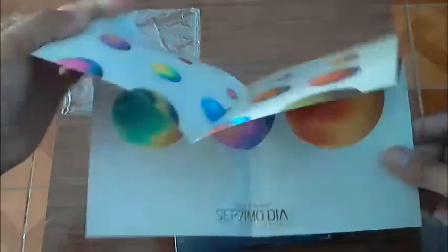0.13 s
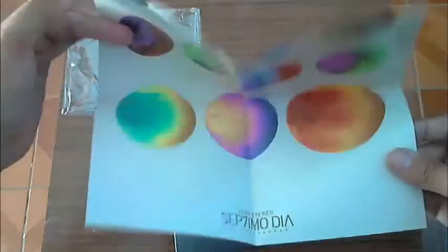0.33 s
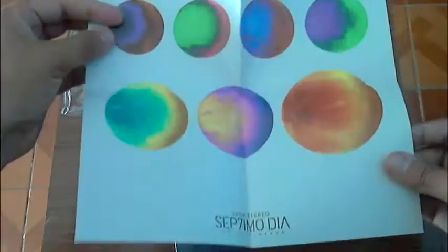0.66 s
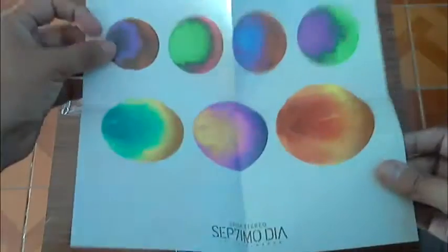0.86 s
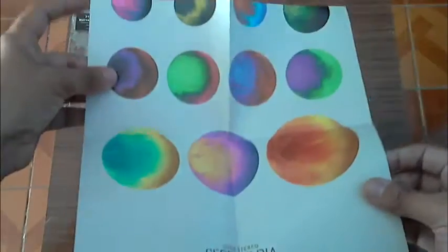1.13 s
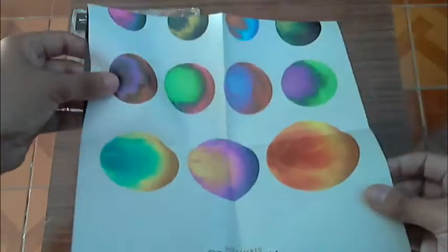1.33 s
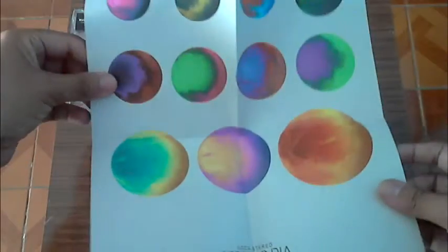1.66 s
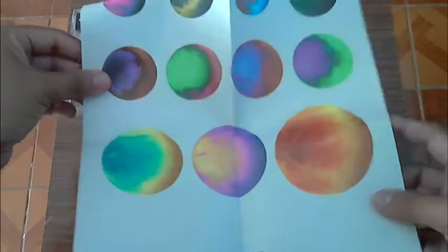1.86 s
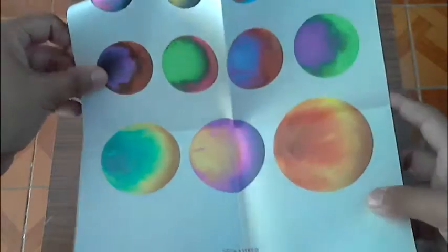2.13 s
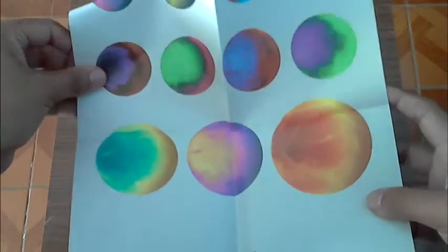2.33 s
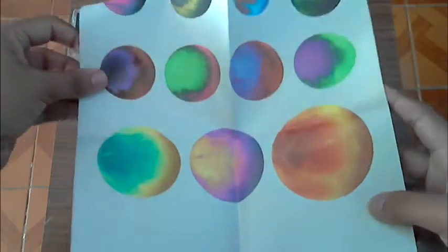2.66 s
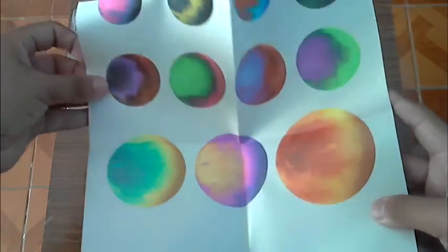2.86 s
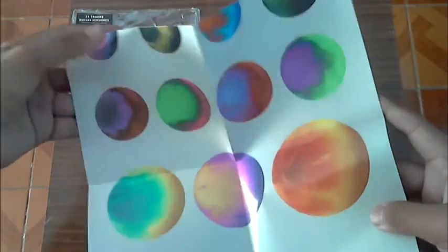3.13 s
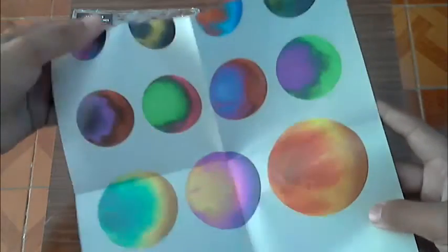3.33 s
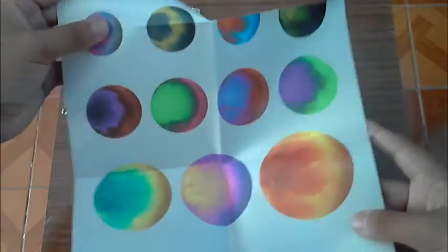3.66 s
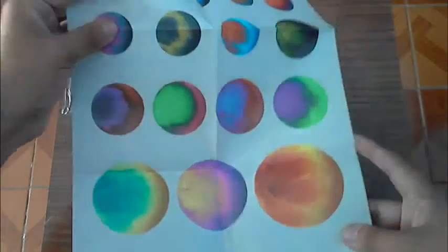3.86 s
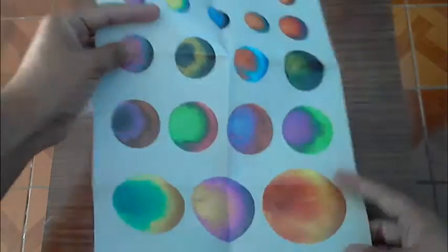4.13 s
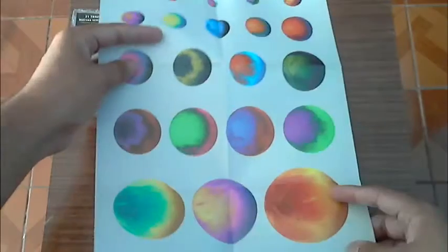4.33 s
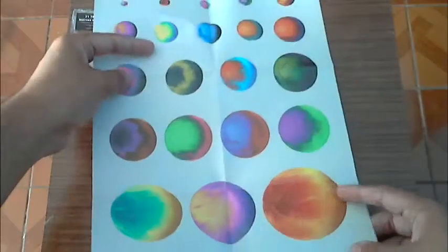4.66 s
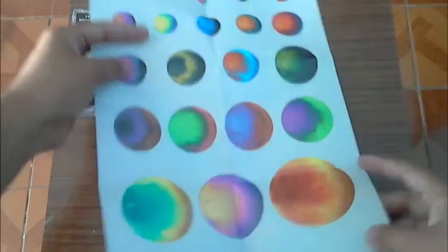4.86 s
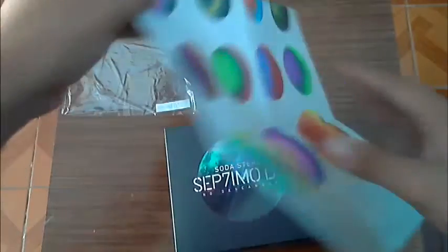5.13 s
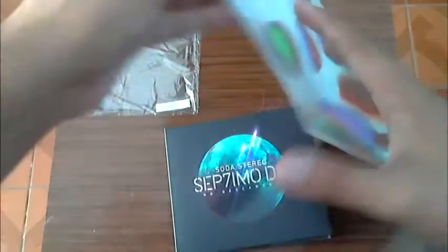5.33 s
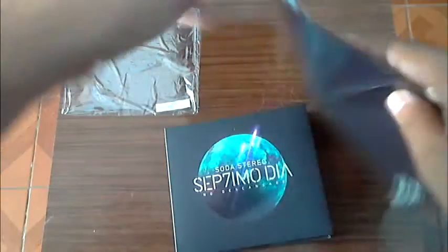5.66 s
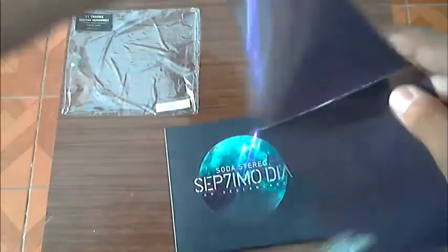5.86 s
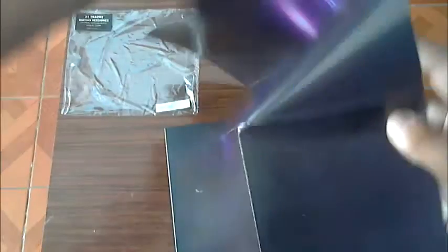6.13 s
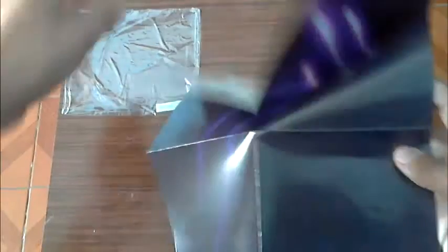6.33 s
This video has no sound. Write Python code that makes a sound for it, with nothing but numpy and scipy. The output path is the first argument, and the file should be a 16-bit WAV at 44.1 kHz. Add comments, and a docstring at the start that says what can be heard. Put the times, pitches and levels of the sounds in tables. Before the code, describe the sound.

A folded paper poster is handled close to a small microphone indoors. It starts with a sharp pop and a brief scrape as the sheet opens. From about 0.8 seconds the creases buckle in irregular, hollow, slightly honky pops over soft crinkling, with strong ones near 0.9 and 1.6 seconds. Short sliding scrapes and more clusters of pops follow between 1.8 and 3 seconds, leading to a loud pop with a dull bump of air at 3.1. More crackles gather from 3.7 seconds, with a sharp snap and scrape at 4. After a brief lull, light pops and rubbing return around 4.8. From 5.3 seconds the paper slides and scrapes as it turns over, and the last fold flaps open in a loud crackling burst just before 6. A few smaller pops finish around 6.4. A short room echo follows the paper, over faint electrical hum and hiss.

```python
"""At a wooden desk, a folded paper poster is opened out and turned over close to a small camera.
Its creases buckle with hollow pops, its panels crinkle, slide and shove the air, and the last fold
flaps open in one burst. The tone shapes include the microphone's port (its small opening), which honks
near 850 Hz and whistles near 6 kHz. A short room echo follows the paper; mains hum and hiss lie beneath."""
import sys
import numpy as np
from scipy import signal
from scipy.fft import rfft, irfft
from scipy.io import wavfile
from scipy.ndimage import map_coordinates

SR = 44100
rng = np.random.default_rng(int(sys.argv[2]) if len(sys.argv) > 2 else 0)


def file_out(sig):
    """Save sig as 16-bit WAV at sys.argv[1]."""
    # one column per channel
    cols = np.atleast_2d(sig).T
    # limit, then scale
    lim = np.clip(cols, -1, 1)
    pcm = np.round(lim * 32767).astype(np.int16)
    wavfile.write(sys.argv[1], SR, pcm)


N = 286393

# tone of paper scraping, strongest in the middle range: f/Hz, level/dB
SCRAPE_TONE = [(150, -30), (500, 4), (900, -5), (1400, 5.5), (1900, -8.5), (2500, -16.5), (3100, -32.5),
               (4400, -27.5), (8000, -40), (15000, -51)]
# tone of the high hiss of rubbing, with the port's whistle: f/Hz, level/dB
HISS_TONE = [(1500, -2), (3100, -22), (4400, -15), (5000, -6), (5700, -3), (6250, 9), (6700, -9),
             (7500, -20.5), (11000, -43), (16000, -82)]


def crease_pops(bend_db, ring_rise_s=0.0014, echo_db=-15, echoes=6):
    """A crease snaps through: a brief ring, a push of air, a crack, then echoes off desk and sheet."""
    # the main creases giving way: t/s, level/dB, f/Hz, sharpness/dB
    creases = [(0.044, -8, 760, -8), (0.0452, -26, 2070, -27), (0.516, -28.5, 810, -49),
               (0.6452, -28, 800, -35), (0.6799, -25.5, 810, -46), (0.845, -13, 814, -40),
               (0.9325, -3, 895, -53), (1.2196, -21.5, 914, -18), (1.2533, -15.5, 940, -18.5),
               (1.3062, -13.5, 930, -44), (1.3413, -9, 917, -50), (1.5156, -11.5, 900, -55),
               (1.5358, -11, 890, -58), (1.5825, 1.5, 816, -50), (1.7985, -12, 1040, -52),
               (1.8132, -11.5, 1040, -61), (1.8279, -13.5, 994, -61), (1.913, -17.5, 950, -61),
               (1.9438, -15, 996, -52), (2.1413, -25.5, 850, -43), (2.212, -22, 780, -37),
               (2.2944, -14.5, 904, -28), (2.379, -25.5, 1360, -18), (2.5037, -17.5, 1100, -25),
               (2.5269, -13.5, 930, -51), (2.5974, -14, 890, -28), (2.6305, -7.5, 890, -57),
               (2.6675, -11.5, 880, -39), (2.7104, -10.5, 846, -29), (2.9012, -18.5, 850, -39),
               (2.9223, -8.5, 800, -27), (3.0222, -14.5, 794, -58), (3.073, -5.5, 743, -55),
               (3.081, 0, 820, -39), (3.1526, -10.5, 805, -61), (3.2275, -21.5, 756, -28),
               (3.4074, -16.5, 820, -52), (3.7131, -8.5, 775, -40), (3.8443, -10, 1000, -19.5),
               (3.8676, -7.5, 840, -61), (3.8751, -10, 790, -49), (3.9688, -11, 926, -27),
               (4.0034, -2, 1056, -18.5), (4.1016, -16.5, 887, -43), (4.743, -14.5, 1040, -23),
               (4.9005, -16, 720, -37), (5.0622, -22, 700, -20), (5.455, -19, 604, -41),
               (5.505, -16.5, 965, -45), (5.8066, -15.5, 670, -44), (5.9542, -3, 806, -23),
               (6.0726, -12, 627, -26), (6.341, -20, 870, -41), (6.361, -16, 770, -30),
               (6.3773, -15, 900, -38), (6.4298, -11, 937, -41)]
    t = np.arange(SR // 20) / SR
    out = np.zeros(N + SR)
    for start, db, hz, sharp_db in list(creases) + small_creases(bend_db):
        # a sharper crease gives way faster and cracks harder
        rise_s = ring_rise_s * amp(-0.031 * (sharp_db + 45.5))
        ring = swell(t, rise_s) * np.sin(2 * np.pi * (hz * t + rng.random()))
        thump = amp(-22) * swell(t, rise_s=0.00097)
        burst = swell(t, rise_s=0.00034) * rng.standard_normal((2, len(t)))
        crack, tick = shape_tone(burst[0], SCRAPE_TONE), shape_tone(burst[1], HISS_TONE)
        crack *= amp(0.33 * sharp_db - 7) / np.abs(crack).max()
        tick *= amp(sharp_db - 1) / np.abs(tick).max()
        pop = (ring + thump + crack + tick) * amp(db) * rng.choice([-1, 1])
        out[round(start * SR):][:len(t)] += pop
        # the sheet keeps moving, so every pop finds new echo paths
        for lateness, sign in zip(rng.random(echoes), rng.choice([-1, 1], echoes)):
            echo_start = start + 0.003 + 0.0091 * lateness
            out[round(echo_start * SR):][:len(t)] += amp(echo_db) * sign * np.exp(-lateness) * pop
    return out[:N]


def small_creases(bend_db, count=70, hz=890, scatter_octaves=0.14, sharp_db=-52):
    """Rows for lesser creases that give way at random, louder the harder the sheet is bent."""
    samples = ((np.arange(count) + rng.random(count)) * N / count).astype(int)
    size, pitch = rng.standard_normal((count, 2)).T
    levels_db = -3.5 + 0.66 * bend_db[samples] + 2 * size
    pitches_hz = hz * 2 ** (scatter_octaves * pitch)
    return [(i / SR, db, f, sharp_db) for i, db, f in zip(samples, levels_db, pitches_hz)]


def bending(build_db_per_s=344, relax_db_per_s=218, held_db=-49.5):
    """How hard the sheet is bent, in dB: bends build, hold and relax; a held sheet still stirs."""
    # each time the hands bend the sheet: start/s, end/s, level/dB
    bends = [(0.152, .16, -29.5), (.57, 0.585, -39.5), (.68, .72, -38.5), (.96, 1.024, -40.5),
             (1.106, 1.306, -34.5), (1.336, 1.77, -30), (1.498, 1.594, -24), (1.79, 1.965, -28.5),
             (2.0, 2.02, -30), (2.306, 2.444, -31.5), (2.527, 2.541, -24), (2.62, 2.745, -27.5),
             (2.897, 2.976, -33), (3.094, 3.143, -20.5), (3.307, 3.399, -27.5), (3.51, 3.534, -29),
             (3.72, 3.942, -30), (4.03, 4.07, -32), (4.11, 4.15, -32.5), (4.17, 4.35, -40.5),
             (4.77, 4.824, -30.5), (4.9, 4.944, -30.5), (5.05, 5.128, -33.5), (5.26, 5.613, -35),
             (5.71, 6.12, -30.5), (6.36, 6.483, -33.5)]
    t = np.arange(N) / SR
    bend_db = np.full(N, held_db)
    for start, end, db in bends:
        before, after = np.maximum(start - t, 0), np.maximum(t - end, 0)
        bend_db = np.maximum(bend_db, db - build_db_per_s * before - relax_db_per_s * after)
    return bend_db


def rustle(bend_db):
    """Bent panels crinkle in little clumps and whisper under the fingers, more so when bent harder."""
    # tone of crinkling paper, with the port's honk: f/Hz, level/dB
    crinkle_tone = [(40, -31), (120, -12.5), (220, -11), (280, -18), (380, -13.5), (500, -14), (700, -4),
                    (860, 1), (1080, -5.5), (1350, -17), (1900, -30.5), (3000, -46), (8000, -60)]
    clumps = unit(amp(3 * wobble(60)))
    crinkle = amp(bend_db - 2.5) * clumps * crackle(crinkle_tone, 380, spread_db=-0.5, noise_db=-13.5)
    whisper_db = 0.5 * bend_db - 49 + 4.5 * wobble(25)
    whisper = amp(whisper_db) * crackle(HISS_TONE, 600, spread_db=5, noise_db=-12)
    return crinkle + whisper


def sliding():
    """Paper dragged over paper or skin catches and slips: a grainy scrape with a hiss on top."""
    # each drag: fastest moment/s, length/s, scrape level/dB, hiss level/dB
    strokes = [(0.06, 0.18, -44.5, -51.5), (0.153, 0.066, -34, -54), (1.314, .06, -55, -51.5),
               (1.433, 0.045, -63, -54), (1.783, 0.18, -39, -45), (1.963, 0.11, -46, -60),
               (2.353, 0.15, -37.5, -61), (2.454, 0.14, -32, -71), (2.67, 0.52, -52, -56.5),
               (3.31, 0.25, -51, -64), (3.843, 0.045, -31, -69), (4.036, .13, -32.5, -51.5),
               (4.779, .2, -40.5, -53), (5.333, 0.26, -42.5, -73), (5.57, 0.27, -33, -56),
               (5.757, 0.23, -29.5, -51), (5.887, .16, -56, -44)]
    # breathy tone of glossy faces gliding over each other: f/Hz, level/dB
    gloss_tone = [(1000, 1), (3200, -6), (4400, 0), (5500, -10), (7500, -23), (15000, -38)]
    scrape, hiss = np.zeros((2, N))
    for peak_s, length_s, scrape_db, hiss_db in strokes:
        gain = drag(peak_s, length_s)
        scrape += amp(scrape_db) * gain
        hiss += amp(hiss_db) * gain
    scrape *= crackle(SCRAPE_TONE, 1000, spread_db=3.5, noise_db=-8)
    hiss *= crackle(HISS_TONE, 1800, spread_db=3, noise_db=-8)
    # the glossy faces glide just before the last fold opens
    glide = amp(-49.5) * drag(peak_s=5.83, length_s=0.17) * noise(gloss_tone)
    flicker = amp(2.2 * wobble(70))
    return (scrape + hiss + glide) * flicker


def drag(peak_s, length_s, rise_share=0.47):
    """Loudness of one drag: it speeds up, slows down, and is louder the faster it goes."""
    progress = (np.arange(N) / SR - peak_s) / length_s
    speed = np.interp(progress, [-rise_share, 0, 1 - rise_share], [0, 1, 0])
    return speed ** 1.6


def last_fold(start_s=5.921, rise_s=0.017, hold_s=0.018, peak_db=-15, swell_db=6.5, fade_db_per_s=367):
    """The last fold swings open in a dense run of crackles that starts abruptly, swells and fades."""
    # tone of the swinging fold: f/Hz, level/dB
    swish_tone = [(40, -4.5), (130, -11.5), (210, -2), (290, -12.5), (400, -7), (830, -1.5), (1050, -8),
                  (1500, -6), (2100, -14.5), (3200, -34), (4500, -35.5), (5500, -39), (6250, -21.5),
                  (7300, -59), (15000, -57)]
    t = np.arange(N) / SR - start_s
    rise_db = swell_db * np.clip(1 - t / rise_s, 0, 1)
    fade_db = fade_db_per_s * np.maximum(t - rise_s - hold_s, 0)
    gain = amp(peak_db - rise_db - fade_db) * (t > 0)
    return gain * crackle(swish_tone, 1500, spread_db=6, noise_db=-6)


def panel_bumps():
    """A whole panel flips and shoves the air, making a dull bump."""
    # each flip: t/s, level/dB, f/Hz
    flips = [(0.046, -34, 200), (.218, -28, 582), (1.585, -15.5, 347), (3.08, -18.5, 130),
             (3.496, -23.5, 132), (3.714, -26, 213), (3.867, -26.5, 202), (4.901, -26.5, 245),
             (5.804, -21, 200), (5.955, -19, 210)]
    t = np.arange(SR // 10) / SR
    out = np.zeros(N + SR)
    for start, db, hz in flips:
        bump = amp(db) * swell(t, rise_s=0.0033) * np.sin(2 * np.pi * hz * t)
        out[round(start * SR):][:len(t)] += bump
    return out[:N]


def room_echo(paper, level_db=-15, positions=10, onset_s=0.0009):
    """The room answers with a short wash of echoes that changes as the sheet moves about."""
    # how long the room rings: f/Hz, time to fade by 60 dB/s
    fade_times = [(150, 1), (900, 0.29), (3000, 0.12), (10000, 0.12)]
    out = np.zeros(N)
    position = np.linspace(0, positions - 1, N)
    for k in range(positions):
        hz, t, bands = signal.stft(rng.standard_normal(SR // 2), SR, nperseg=256)
        fade = amp(-60 * t / value_at(fade_times, hz)[:, None])
        onset = 1 - np.exp(-t / onset_s)
        tail = signal.istft(bands * fade * onset, SR, nperseg=256)[1]
        share = np.maximum(1 - np.abs(position - k), 0)  # blend from one position to the next
        out += signal.oaconvolve(paper * share, tail / np.linalg.norm(tail))[:N]
    return amp(level_db) * out


def background():
    """Room rumble, microphone hiss and a slightly wavering hum from the mains power."""
    # mains hum and electrical whine: f/Hz, average level/dB
    hum_tones = [(49.9, -45.5), (150, -52), (250, -60), (1803, -67), (3607, -77), (9028, -88)]
    # tone of the rumble and hiss: f/Hz, level/dB
    noise_tone = [(20, -16), (46, 15), (90, -2.5), (220, -4.5), (290, -4), (500, -6.5), (1000, -10.5),
                  (1500, -16), (2200, -27), (3200, -30), (7500, -33), (15000, -34)]
    t = np.arange(N) / SR
    hum = sum(amp(db + 0.8 * wobble(14)) * np.sqrt(2) * np.cos(2 * np.pi * hz * t)
              for hz, db in hum_tones)
    return hum + amp(-42) * noise(noise_tone)


def crackle(tone, slips_per_s, spread_db, noise_db):
    """Tiny random slips of uneven size click over a bed of smooth noise."""
    sizes = amp(spread_db * np.clip(rng.standard_normal(N), -2, 2)) * rng.choice([-1, 1], N)
    slips = sizes * (rng.random(N) < slips_per_s / SR)
    return unit(shape_tone(unit(slips) + amp(noise_db) * rng.standard_normal(N), tone))


def noise(tone):
    """Steady noise with the given tone."""
    return unit(shape_tone(rng.standard_normal(N), tone))


def shape_tone(x, tone, size=8192):
    """Make each frequency louder or softer, as the tone table says."""
    cepstrum = irfft(np.log(amp(value_at(tone, np.fft.rfftfreq(size, 1 / SR)))))
    # fold the filter forward in time, so a click rings only after it starts
    cepstrum[1:size // 2] *= 2
    cepstrum[size // 2 + 1:] = 0
    return signal.fftconvolve(x, irfft(np.exp(rfft(cepstrum))))[:len(x)]


def swell(t, rise_s):
    """A push that starts softly, peaks at 1 after rise_s and dies away."""
    return (t / rise_s * np.exp(1 - t / rise_s)) ** 2


def wobble(rate):
    """A smooth curve through random points, rate of them a second."""
    return map_coordinates(rng.standard_normal(int(N * rate / SR) + 4), [np.arange(N) * rate / SR])


def value_at(table, hz):
    """Read between the rows of a frequency table, on a pitch (log) scale."""
    freqs, values = np.transpose(table)
    return np.interp(np.log(hz + 1), np.log(freqs + 1), values)


def amp(db):
    """Turn decibels into a factor to multiply by."""
    return 10 ** (np.asarray(db) / 20)


def unit(x):
    """Scale a sound to an average strength (rms) of 1."""
    return x / np.sqrt(np.mean(x ** 2) + 1e-20)


def scene():
    """The paper, its room echo and the background, in one channel."""
    bend_db = bending()
    paper = amp(1.93) * crease_pops(bend_db) + panel_bumps() + rustle(bend_db) + sliding() + last_fold()
    return (paper + room_echo(paper) + background())[None]


def record(dry, top_hz=15900):
    """The loudest pops have their peaks cut flat, and all sound above top_hz is removed."""
    clipped = np.clip(dry, -1, 1)
    return irfft(rfft(clipped) * (np.fft.rfftfreq(N, 1 / SR) < top_hz), N)


dry = scene()
out = record(dry)
file_out(out)
```